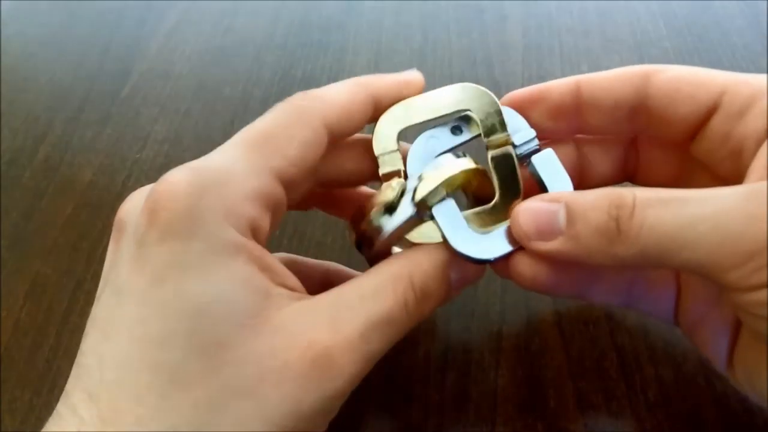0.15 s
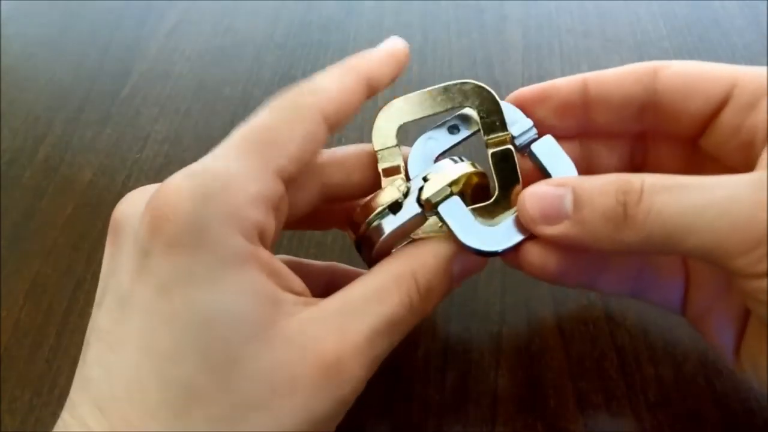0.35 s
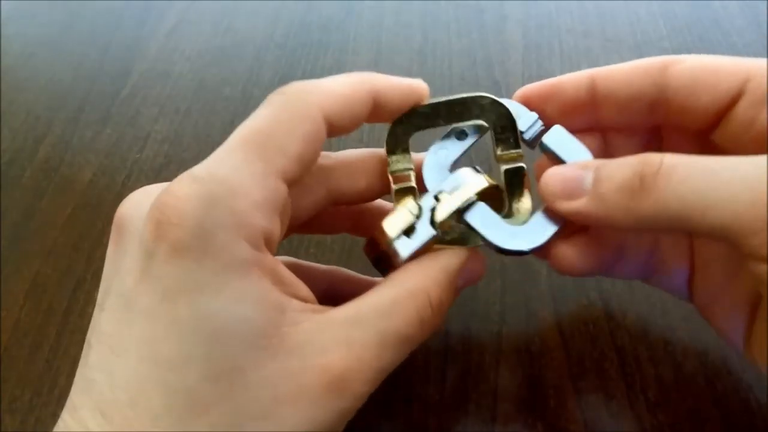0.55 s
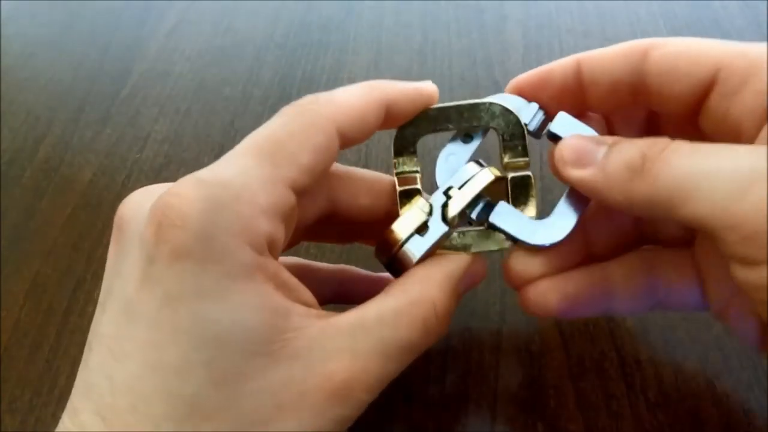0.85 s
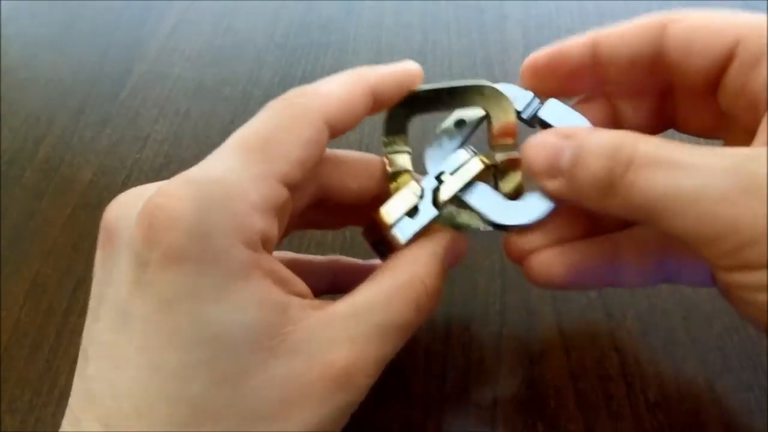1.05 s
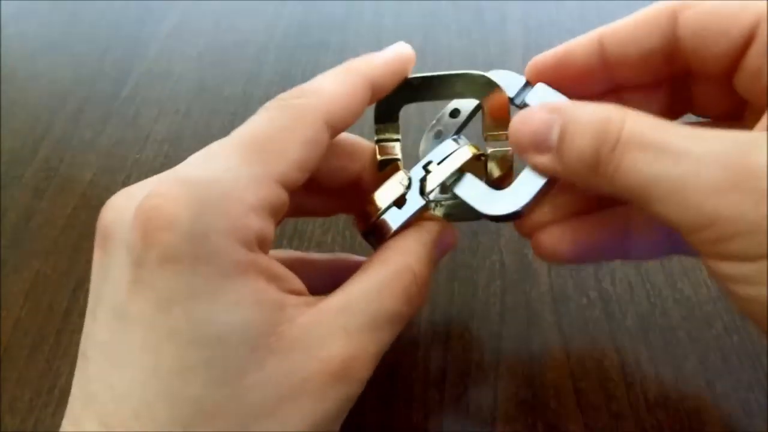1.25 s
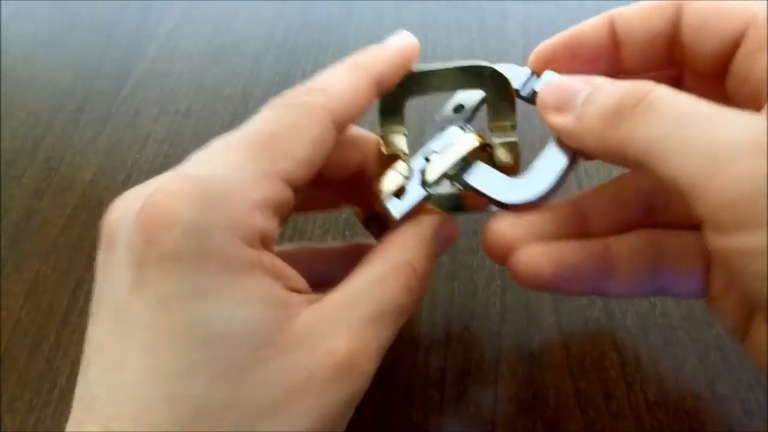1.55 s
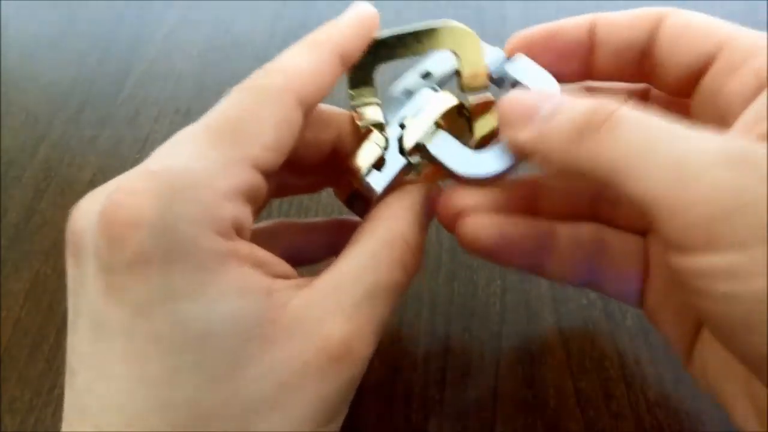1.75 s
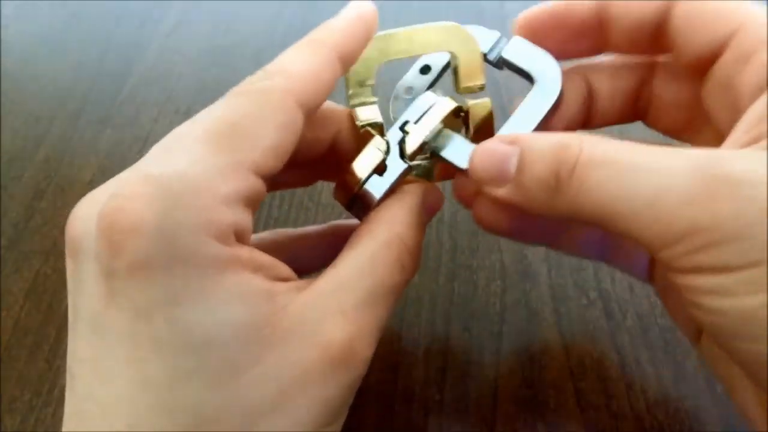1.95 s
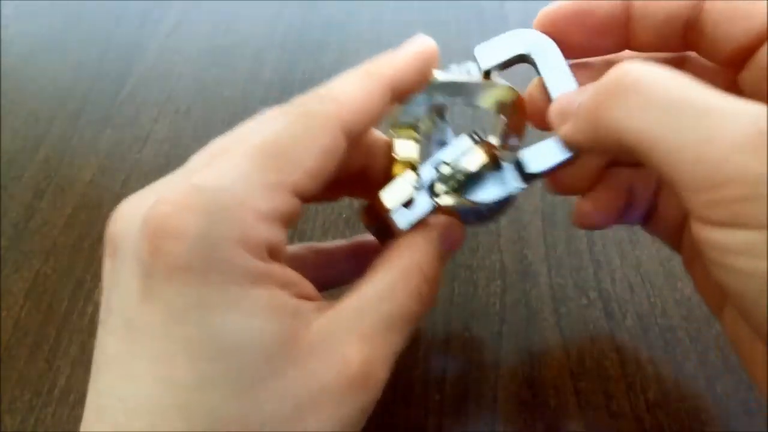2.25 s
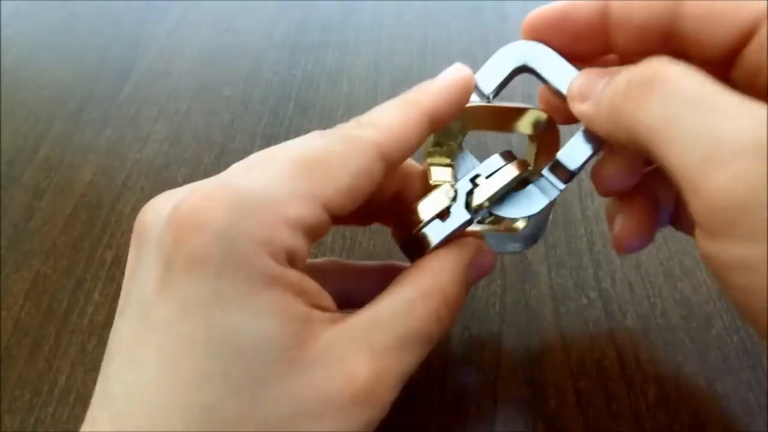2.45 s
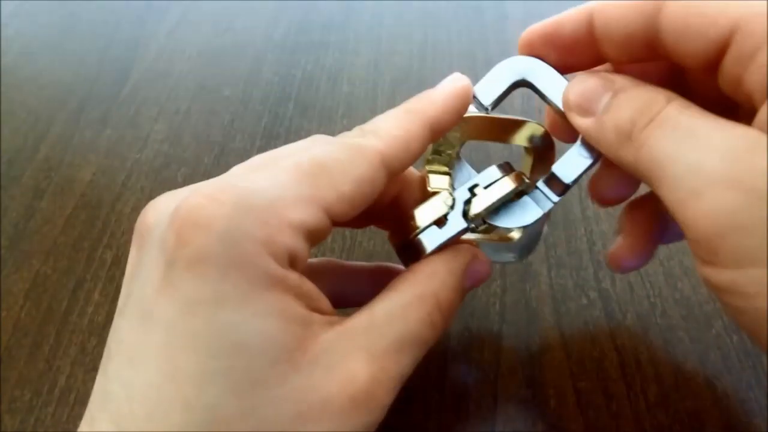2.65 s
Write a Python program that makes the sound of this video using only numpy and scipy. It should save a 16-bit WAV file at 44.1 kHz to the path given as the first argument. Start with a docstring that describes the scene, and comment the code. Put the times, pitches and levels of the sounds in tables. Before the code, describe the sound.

Close-up handling of a small metal puzzle, with a faint opening scrape, a flurry of hard clicks, isolated clacks with pauses, then clustered scrapes and knocks near the end, over low appliance hum indoors.

```python
"""Two hands work a cast metal puzzle above a table in a small room, over steady appliance hum and room air.
It opens on a scrape: stick-slip steps shake the gripped brass and steel pieces, which ring briefly.
From 0.18 s knocks, each a few milliseconds of chattering bounces, crowd the first half second, then thin out.
From 2.06 s scrapes cluster among the knocks; a last short scrape comes at 2.69 s.
Reflections follow each contact; a noise suppressor turns everything down in the pauses."""
import sys
import numpy as np
from scipy import signal
from scipy.fft import rfft, irfft, next_fast_len
from scipy.io import wavfile
from scipy.ndimage import uniform_filter1d

SR = 44100
rng = np.random.default_rng(int(sys.argv[2]) if len(sys.argv) > 2 else 0)


def wrap_up_sound(samples):
    """Save the sound to the file named by the first command line argument, as 16-bit audio."""
    columns = np.atleast_2d(samples).T
    # keep every value between -1 and 1, then stretch to whole-number steps
    tamed = np.clip(columns, -1, 1)
    steps = np.round(tamed * 32767).astype(np.int16)
    wavfile.write(sys.argv[1], SR, steps)


N = 123479
CONTACT_SAMPLES = 14000  # longest knock or slide, ringing included


def undb(db):
    """Decibels to gain."""
    return 10 ** (np.asarray(db) / 20)


def unit(x):
    """Scale to unit energy."""
    return x / np.sqrt(np.sum(x ** 2) + 1e-18)


def pan(db):
    """Left and right gains for a left-over-right level difference."""
    return undb(np.array([[db], [-db]]) / 2)


def curve(points, hz):
    """Gain of a (f/Hz, level/dB) curve, interpolated over log frequency."""
    f, db = np.array(points, float).T
    return undb(np.interp(np.log(hz + 1), np.log(f), db))


def shape(x, response):
    """Filter by a function of frequency."""
    n = next_fast_len(x.shape[-1] + SR // 50)
    hz = np.arange(n // 2 + 1) * SR / n
    return irfft(rfft(x, n) * response(hz), n)[..., :x.shape[-1]]


def add(out, start_s, x):
    """Mix a sound in at a time; whatever falls before zero is cut."""
    i = int(start_s * SR)
    x, i = x[:, max(-i, 0):], max(i, 0)
    n = min(x.shape[-1], N - i)
    out[:, i:i + n] += x[:, :n]


def background():
    """Appliance hum: slightly wavering harmonics of a shaft rate, over faint filtered-noise room air."""
    # hum: multiple of the shaft rate, level/dB
    hum_partials = [(1, -61.5), (2, -62), (3, -64), (4, -63), (5, -71), (6, -78), (7, -67), (9, -86),
                    (11, -81.5)]
    # room air spectrum: f/Hz, level/dB
    air_colour = [(25, -11.5), (150, -3.5), (330, -8.5), (480, -15), (1900, -23.5), (6700, -24), (8200, -8),
                  (9800, -10), (12300, -23.5), (16000, -27)]
    shaft_hz, waver_sd_db = 48.92, 0.6
    air_db, left_over_right_db = -57, 3.5
    t = np.arange(N) / SR
    hum = 0
    for multiple, db in hum_partials:
        waver = np.interp(t, np.linspace(0, t[-1], 15), rng.standard_normal(15))
        amplitude = np.sqrt(2) * undb(db + waver_sd_db * waver)
        hum = hum + amplitude * np.sin(2 * np.pi * (multiple * shaft_hz * t + rng.random()))
    noise = shape(rng.standard_normal((3, N)), lambda hz: curve(air_colour, hz))
    # one noise common to both sides, one of its own for each
    air = unit(noise[0] + 2.1 * noise[1:]) * np.sqrt(2 * N) * undb(air_db)
    return (hum + air) * pan(left_over_right_db)


def gripped(hz):
    """Magnitude response of the finger-damped puzzle: broad resonances plus the bare contact tick, in power."""
    # damped resonances: f/Hz, width/Hz, level/dB
    resonances = [(2833, 450, -20.5), (5060, 780, -14.5), (6610, 530, -8.5), (7797, 180, 3.5),
                  (8221, 197, 8.5), (9810, 1050, -2), (10523, 220, 1), (11270, 400, -7)]
    # bare contact tick: f/Hz, level/dB
    tick = [(100, -51.5), (550, -49.5), (850, -33.5), (2200, -31.5), (4000, -19), (9000, -7.5),
            (11500, -19.5), (12500, -26), (15300, -22.5), (17000, -38.5)]
    power = sum(undb(2 * db) / (1 + (2 * (hz - f) / w) ** 2) ** 1.64 for f, w, db in resonances)
    return np.sqrt(power + curve(tick, hz) ** 2)


def body(body_db, bright_db, peak_hz, peak_db, size=1024):
    """Impulse response at one contact point, which tilts the resonances and favours one of them."""
    peak_half_width_hz = 175
    hz = np.fft.rfftfreq(size, 1 / SR)
    colour = curve([(3200, body_db), (8200, 0.006), (10000, bright_db)], hz)
    peak = undb(peak_db / (1 + ((hz - peak_hz) / peak_half_width_hz) ** 2))
    # fold the cepstrum: minimum phase
    cepstrum = irfft(np.log(gripped(hz) * colour * peak))
    cepstrum[1:size // 2] *= 2
    cepstrum[size // 2 + 1:] = 0
    return irfft(np.exp(rfft(cepstrum)))


def ring(partials, t):
    """One piece ringing: beating pairs detuned by the grip, with their own phases at each microphone."""
    t60_s, detune_sd, pair_gap_sd_hz = 0.11, 0.0012, 22
    sound = 0
    for hz, db in partials:
        detune, split = rng.standard_normal(2)
        for side in (-1, 1):
            f = hz * (1 + detune_sd * detune) + side * split * pair_gap_sd_hz / 2
            sound = sound + undb(db) * np.sin(2 * np.pi * (f * t + rng.random((2, 1))))
    return sound * undb(-60 * t / t60_s)


def press(hits):
    """Contact pressure: each hit decays exponentially."""
    decay_s = 0.00098
    return signal.lfilter([1], [1, -np.exp(-1 / (decay_s * SR))], hits)


def contact(pressure, body_db, bright_db, brass_db, steel_db, pan_db, peak_hz, peak_db):
    """Rough metal pressed on metal shakes the gripped puzzle and sets both pieces ringing."""
    # brass partials: f/Hz
    brass_hz = [2934, 4958, 6870, 7500, 8040, 8103, 8165, 9940, 10340, 10645, 11536]
    # brass partials: level/dB
    brass_levels = [-29, -24, -10.5, -17.5, -10.5, -4.5, -9.5, 6, -5, -9.5, -9.5]
    # steel partials: f/Hz
    steel_hz = [1750, 4780, 6620, 7577, 7735, 8250, 9668, 9702, 10245, 10305, 11090]
    # steel partials: level/dB
    steel_levels = [-33.5, -23, -12.5, -14, -15, -19.5, 5.5, -12.5, -3.5, -4.5, -23.5]
    shared_power = 0.66  # part of the force's power alike at both microphones
    size = len(pressure)
    t = np.arange(size) / SR
    grit = rng.standard_normal((3, size))
    force = pressure * (np.sqrt(shared_power) * grit[0] + np.sqrt(1 - shared_power) * grit[1:])

    def driven(response):
        """The force through a response, each side at unit energy."""
        sound = signal.fftconvolve(force, response, axes=1)[:, :size]
        return np.array([unit(side) for side in sound])

    brass = undb(brass_db) * driven(ring(zip(brass_hz, brass_levels), t))
    steel = undb(steel_db) * driven(ring(zip(steel_hz, steel_levels), t))
    shaken = driven(body(body_db, bright_db, peak_hz, peak_db)[None])
    return (shaken + brass + steel) * pan(pan_db)


def slides():
    """Stick-slip: a dense run of random slips in clumps; it swells, holds and lets go."""
    # slides: t/s, length/s, level/dB, body/dB, brightness/dB, brass ring/dB, steel ring/dB,
    # left over right/dB, f of the resonance favoured by the contact point/Hz
    slide_list = [(-.07, 0.081, -35, 11, 7, -0.5, -1.5, -4.5, 9920),
                  (0.014, 0.071, -45.5, 8, 9, 1, -20, -5.5, 5860),
                  (0.21, 0.039, -22, 12.5, 8, -7.5, -6.5, -4.5, 1378),
                  (0.275, 0.028, -22.5, 5, 2.5, -23, -1, -9, 925),
                  (0.316, 0.051, -26, 11.5, 3, -7.5, -20, -6.5, 5100),
                  (0.379, 0.028, -29.5, 4.5, 8.5, -6, -6.5, -4, 2996),
                  (0.475, 0.036, -22.5, 5.5, 8.5, -9, -9, -9.5, 4970),
                  (0.644, 0.019, -37.5, 6.5, 5.5, -4.5, -21, -7, 2900),
                  (0.932, 0.027, -42, 14, 9, -16, -10, -17, 9940),
                  (1.542, 0.023, -34, 2, -5, 3, -14, -7.5, 3900),
                  (1.971, 0.079, -43.5, 0, -1, -11, -22, -2.5, 2860),
                  (2.062, 0.17, -44, -3, 4.5, -14, -14, -7, 4130),
                  (2.23, 0.04, -32.5, 4, 2, -22, -18, -2.5, 8370),
                  (2.243, 0.023, -26, -1, -4.5, -22, -12, -4, 8570),
                  (2.281, 0.036, -27, 7, -1, -29, -3, -5, 6800),
                  (2.349, 0.021, -29, 2, 0, -29, -13, 7, 900), (2.378, 0.039, -37, 6, -3, -22, 1, -9, 4700),
                  (2.444, 0.052, -27.5, 5, 2.5, -27, -7.5, -5, 1680),
                  (2.491, 0.023, -26.5, 10.5, 7.5, -24, 3, -7, 880),
                  (2.693, 0.013, -33, 6, 0.5, -15, -20, -6.5, 7430)]
    slips_per_s, slip_sd_db = 2600, 3.5
    clump_s, clump_sd_db = 0.006, 2
    attack_s, release_s, peak_db = 0.005, 0.014, 9
    out = np.zeros((2, N))
    t = np.arange(CONTACT_SAMPLES) / SR
    for start_s, length_s, db, *tone in slide_list:
        sizes = undb(slip_sd_db * rng.standard_normal(len(t)))
        slips = (rng.random(len(t)) < slips_per_s / SR) * sizes
        steps = np.arange(0, t[-1], clump_s)
        clumps = undb(clump_sd_db * np.interp(t, steps, rng.standard_normal(len(steps))))
        push = np.minimum(t / attack_s, 1) * np.exp(-np.maximum(t - length_s, 0) / release_s)
        sound = contact(press(slips * clumps * push), *tone, peak_db)
        add(out, start_s, undb(db) * np.sqrt(length_s * SR) * sound)
    return out


def knocks():
    """Each knock is a quick run of bounces that dies out with its chatter time."""
    # knocks: t/s, level over 5 ms/dB, chatter/ms, body/dB, brightness/dB, brass ring/dB, steel ring/dB,
    # left over right/dB, f of the resonance favoured by the contact point/Hz, its height/dB
    knock_list = [(0.1845, -24.5, 4.9, 17, 16.5, -7, -28, -6.5, 10470, 14),
                  (0.2355, -30, 2.3, 11, 0, -7, -14.5, -1.5, 2970, 18),
                  (0.2706, -8, 4.6, 1.5, -3.5, -26, -10, -5, 7250, 7),
                  (0.285, -19, 3.2, -3, -1, -20, -8, 3, 6550, 11),
                  (0.3394, -21.5, 5.1, 4.5, 7, -5, -24, 11.5, 10450, 12),
                  (0.3481, -14, 7.3, -8, 6, -4, -29, -1.5, 10200, 16),
                  (0.4704, -6, 5.6, -0.5, 9.5, -8, -36, -2.5, 6900, 6.5),
                  (0.491, -15.5, 3.8, -7, 2.5, -15, -17, -6, 8060, 12),
                  (0.51, -28, 2.9, 4, -6, -10, -5, 7.5, 2710, 10),
                  (0.544, -24, 5.7, 8.5, 4.5, -1.5, -11, -8.5, 10570, 10.5),
                  (0.8533, -21, 4.1, 1.5, 5, -17, -21, -4, 2930, 9),
                  (0.91, -9.5, 6.6, 2, 5, -13, -25, -4, 1410, 8),
                  (1.0792, -24, 4.3, -0.5, 3.5, -42.5, -33, -6.5, 5300, 12),
                  (1.2910, -30, 5.3, 2, 10.5, -14.5, -24, -6, 8180, 11.5),
                  (1.4007, -30.5, 10.7, 2, 1, -15, -27, -2, 3140, 16),
                  (1.4127, -13, 2.94, -28, 1.5, -35, -8, -3.5, 4725, 16.5),
                  (1.5415, -21.5, 3.4, 12.5, 8, -20.5, -27.5, -4, 10520, 6.5),
                  (1.5565, -30, 5.6, 4, 0.5, -15.5, -24, -7, 4100, 13),
                  (1.9508, -35.5, 2.6, 3, 0, -18.5, -21, -3.5, 8100, 9),
                  (1.9683, -31, 3.1, 2, 3, -23.5, -28, -4, 2780, 15),
                  (2.0457, -13, 4.1, -4, 0, -28, -15, -1.5, 2920, 13),
                  (2.3605, -25, 2.8, -1.5, 1.5, -23, -31, -22.5, 960, 14),
                  (2.4370, -18, 4.3, 6.5, 4.5, -28, -18, 1.5, 1750, 11.5),
                  (2.4869, -7, 3.2, -2.5, -1, -33, -2.5, -5.5, 4570, 9)]
    gap_ms, bounce_sd_db = 0.97, 4
    out = np.zeros((2, N))
    for start_s, db, chatter_ms, *tone in knock_list:
        gap, strength = rng.standard_normal((2, 12))
        gaps_ms = gap_ms * np.exp(0.3 * gap)
        bounces_ms = np.cumsum(gaps_ms) - gaps_ms[0]
        sizes = undb(bounce_sd_db * strength) * np.exp(-(bounces_ms / chatter_ms) ** 4)
        at = (bounces_ms * SR / 1000).astype(int)
        hits = np.bincount(at, sizes, CONTACT_SAMPLES)[:CONTACT_SAMPLES]
        sound = contact(press(hits), *tone)
        add(out, start_s, undb(db) * np.sqrt(SR // 200) * sound)
    return out


def room(x):
    """Near reflections from table and hands plus the room's tail: decaying coloured noise, convolved."""
    # colour of the reflections: f/Hz, level/dB
    reflection_colour = [(300, 6), (1200, 3.5), (3000, 3), (6000, -5), (8200, -4), (10000, -2.5),
                         (14000, -4.5)]
    early_db, early_t60_s = -6, 0.1  # levels ahead of the colour
    late_db, late_t60_s = -8.5, 0.48
    onset_s = 0.0016
    t = np.arange(SR) / SR

    def tail(t60_s):
        """Unit-energy decaying noise for each side."""
        envelope = undb(-60 * t / t60_s) * (1 - np.exp(-(t / onset_s) ** 2))
        return np.array([unit(noise * envelope) for noise in rng.standard_normal((2, SR))])

    tails = undb(late_db) * tail(late_t60_s) + undb(early_db) * tail(early_t60_s)
    response = shape(tails, lambda hz: curve(reflection_colour, hz))
    return signal.fftconvolve(x, response, axes=1)[:, :N]


def right_microphone(x):
    """The right microphone hears the puzzle a little later, quieter and with less of the top."""
    # right microphone against the left: f/Hz, level/dB
    mic_colour = [(500, -10.5), (2800, -8.5), (5000, -8), (8200, -4), (10000, -21), (12000, -13),
                  (15000, -15)]
    lag_s = 0.000093
    return shape(x, lambda hz: curve(mic_colour, hz) * np.exp(-2j * np.pi * hz * lag_s))


def scene():
    """The puzzle in its room, at two microphones, over the background."""
    puzzle = slides() + knocks()
    left, right = puzzle + room(puzzle)
    return background() + np.array([left, right_microphone(right)])


def record(dry):
    """Noise suppressor lowers the gain as the sound gets quiet; high peaks are rounded, the top is cut."""
    below_db, slope, max_cut_db = -38.5, 0.62, 10
    envelope_s, smooth_s = 0.13, 0.083
    peak_limit, top_hz = 0.85, 15900
    keep = np.exp(-1 / (envelope_s * SR))
    loudness = np.abs(dry).mean(axis=0)
    initial = [loudness[:SR // 50].mean()]
    envelope = signal.lfilter([1 - keep], [1, -keep], loudness, zi=initial)[0]
    envelope_db = 20 * np.log10(envelope + 1e-9)
    gain_db = np.clip(slope * (envelope_db - below_db), -max_cut_db, 0)
    x = dry * undb(uniform_filter1d(gain_db, int(smooth_s * SR)))
    x = x / (1 + (x / peak_limit) ** 6) ** (1 / 6)
    return signal.sosfilt(signal.ellip(8, 0.2, 70, top_hz, fs=SR, output="sos"), x)


dry = scene()
out = record(dry)
wrap_up_sound(out)
```